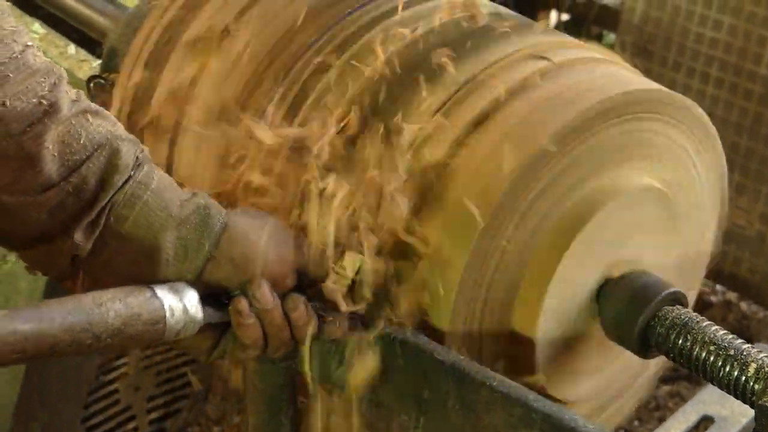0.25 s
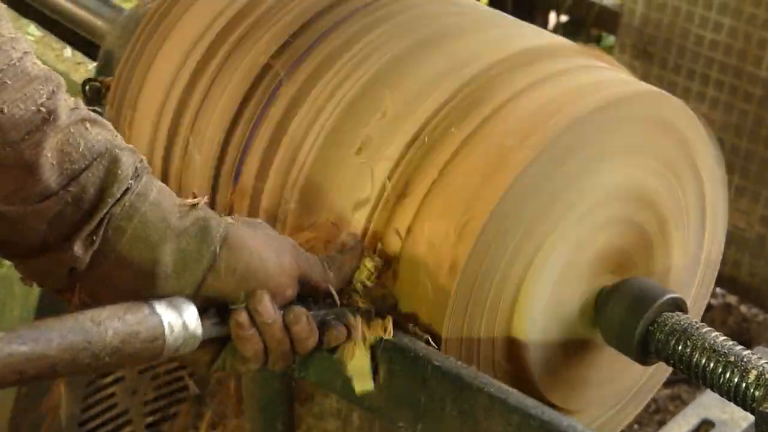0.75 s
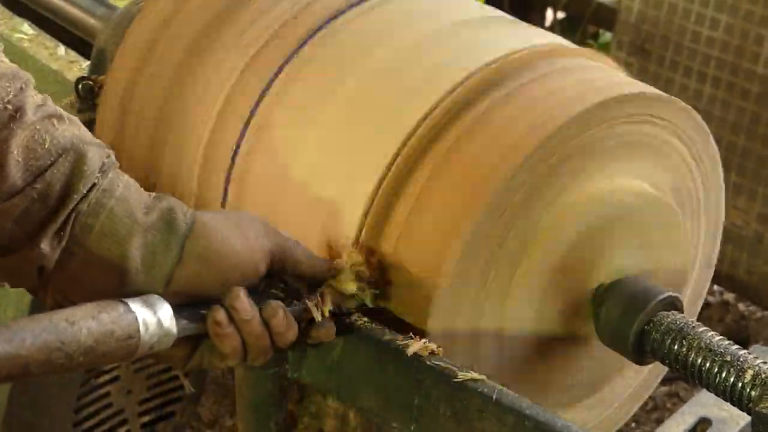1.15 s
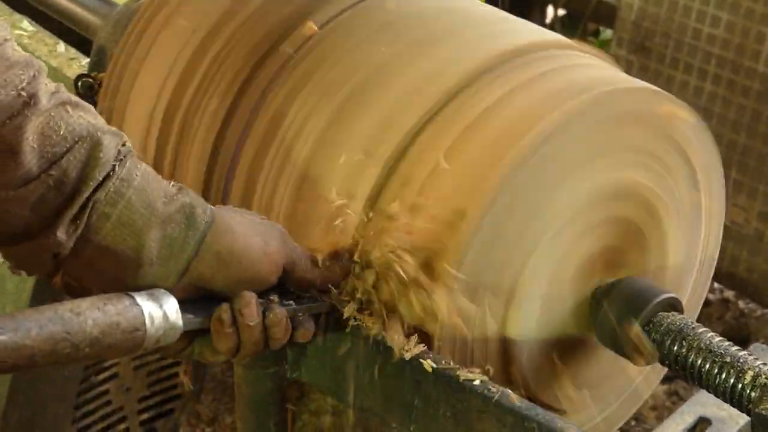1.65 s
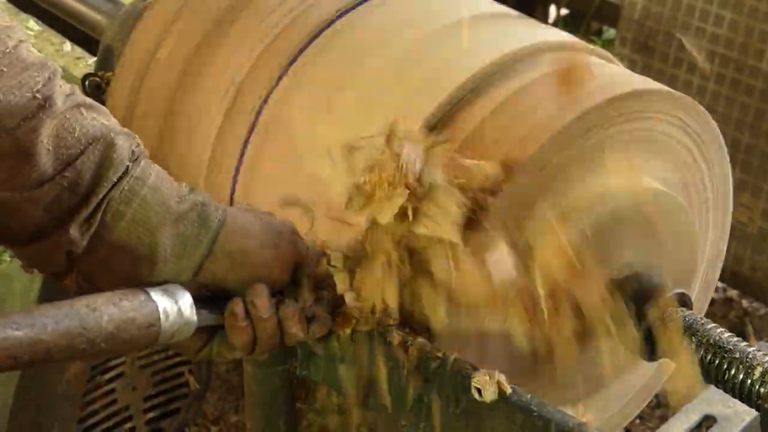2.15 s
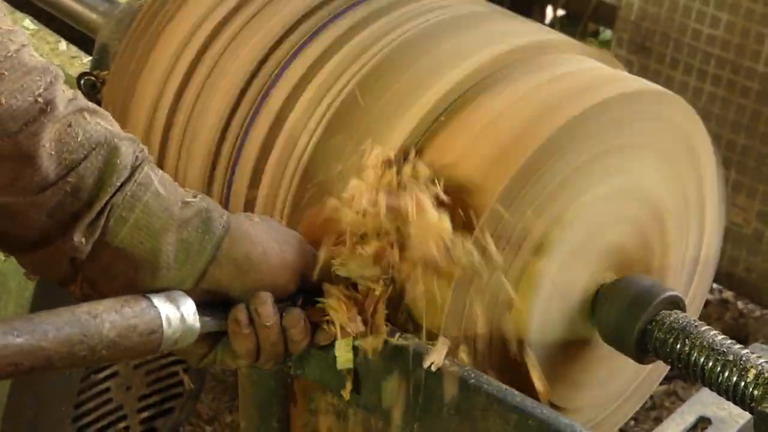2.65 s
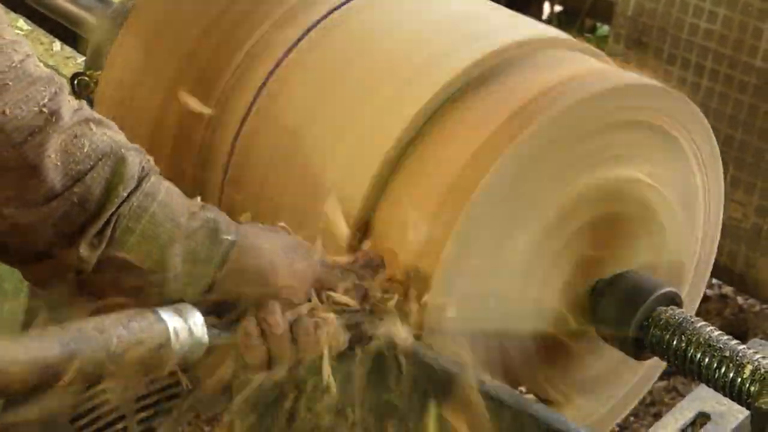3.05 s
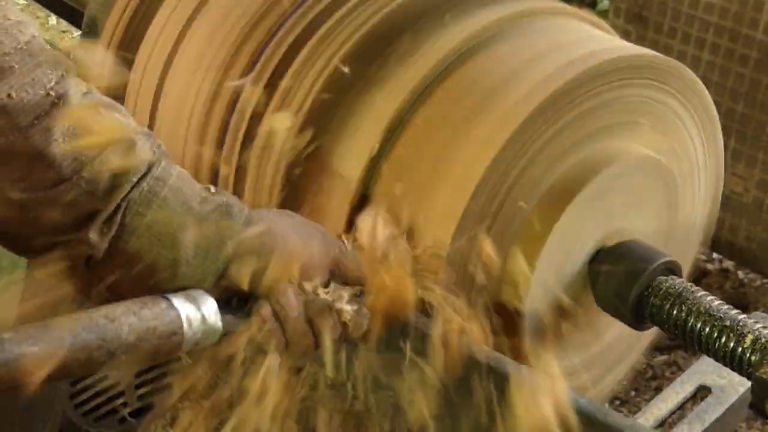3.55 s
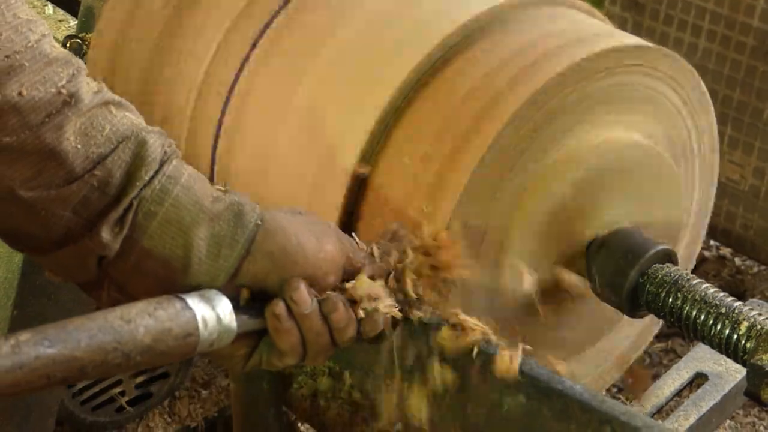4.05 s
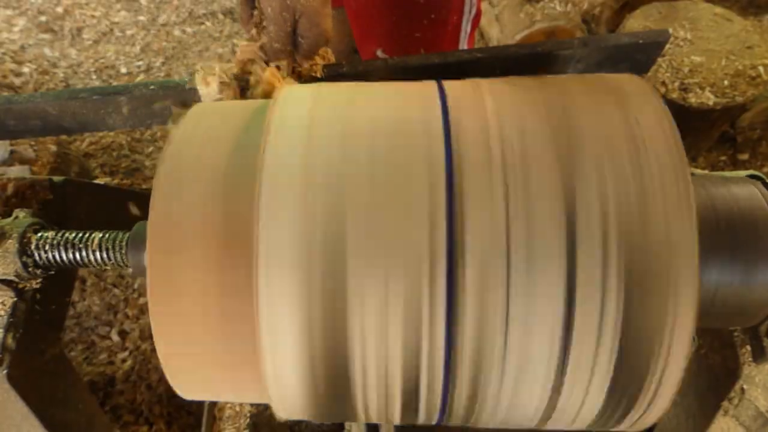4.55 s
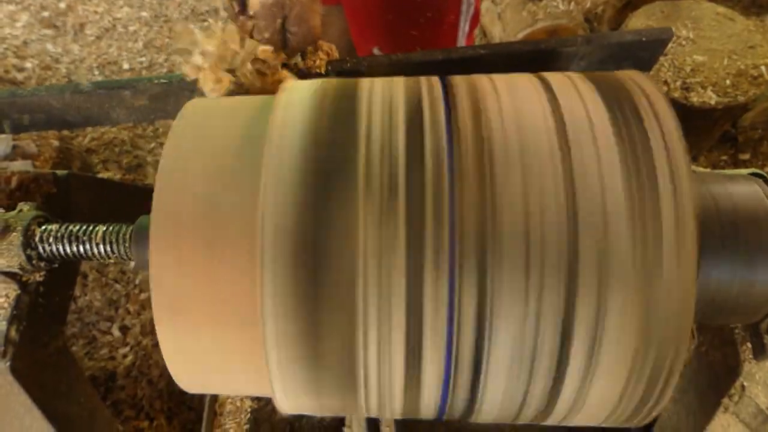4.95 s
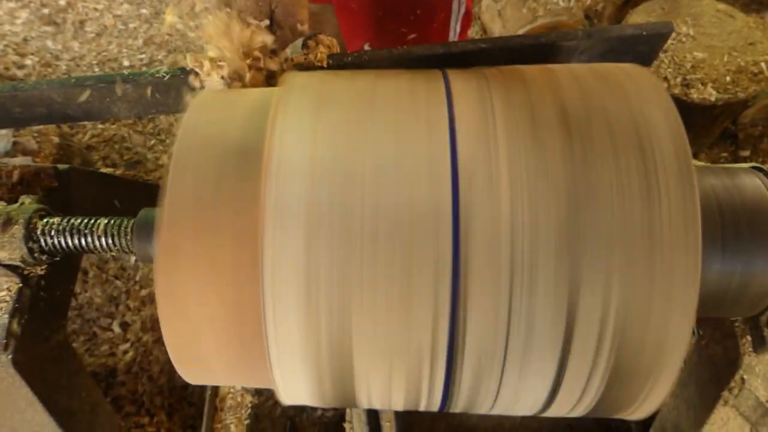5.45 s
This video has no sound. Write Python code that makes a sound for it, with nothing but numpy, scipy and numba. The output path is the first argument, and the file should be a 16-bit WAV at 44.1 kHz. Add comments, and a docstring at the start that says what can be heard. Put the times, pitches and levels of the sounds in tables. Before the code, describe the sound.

A gouge tears at a large spinning wooden blank, harsh pulsing hiss and metallic chatter over a low lathe rumble, with brief pauses and one silent gap.

```python
"""A gouge roughs a big wooden blank on a lathe, heard from two places with a silent gap between them.
Tearing fibres are a noise force, chopped by chatter and hollows, that excites the resonances of the steel.
Shavings are banded noise that outlasts the cut; the lathe is a coloured rumble with wavering hums;
the shed answers with a short decaying tail, and knocks are noise swells in the modes of the wood."""
import sys
import numpy as np
from scipy import signal
from scipy.fft import rfft, irfft
from scipy.io import wavfile
from scipy.ndimage import uniform_filter1d
from numba import njit

SR = 44100
rng = np.random.default_rng(int(sys.argv[2]) if len(sys.argv) > 2 else 0)


def persist_wave(psi):
    """Save psi, clipped to +-1, as 16-bit WAV."""
    counts = np.round(np.clip(psi, -1, 1) * 32767).astype(np.int16)
    wavfile.write(sys.argv[1], SR, np.atleast_2d(counts).T)


def field_ratio(decibels):
    """Amplitude ratio for a level in dB (20 dB per decade); scalars and array-likes work."""
    return 10 ** (np.asarray(decibels, dtype=float) / 20)


N = 251370
T = np.arange(N) / SR
STOP_S, RESTART_S = 4.432, 4.599  # the sound stops, then starts again from the second place
PLACE = (T > STOP_S).astype(int)  # 0 at the first place, 1 at the second


def unit(x):
    """Power normalization: scale to rms 1."""
    return x / np.sqrt(np.mean(x ** 2))


def curve(table):
    """Linear interpolation: columns of a (time [s], value, ..) table, one value a sample."""
    s, *columns = np.transpose(table)
    return [np.interp(T, s, column) for column in columns]


def colour(x, points):
    """Linear filtering: weight the spectrum by gains at points (frequency [Hz], gain [dB])."""
    hz, db = np.transpose(points)
    log_hz = np.log(np.fft.rfftfreq(N, 1 / SR) + 1)
    gain = field_ratio(np.interp(log_hz, np.log(hz), db))
    return irfft(rfft(x) * gain, N)


def walk(rate):
    """Slow random modulation: levels held 1 / rate s and smoothed, with rms 1."""
    hold = max(int(SR / rate), 1)
    steps = np.repeat(rng.standard_normal(N // hold + 1), hold)
    return unit(uniform_filter1d(steps, hold)[:N])


@njit
def ring(x, hz, width):
    """Resonance: a state-variable band-pass with moving centre and width [Hz], gain 1 at the centre."""
    y, band, low = np.empty(len(x)), 0., 0.
    for i in range(len(x)):
        g, damping = np.tan(np.pi * hz[i] / SR), width[i] / hz[i]
        v = (band + g * (x[i] - low)) / (1 + g * (g + damping))
        band, low, y[i] = 2 * v - band, low + 2 * g * v, damping * v
    return y


def steady_ring(x, hz, width):
    """Time-invariant resonance: its centre and width [Hz] stay in place."""
    return ring(x, np.full(N, 1. * hz), np.full(N, 1. * width))


def strikes(times, levels_db, rise_s, fall_s):
    """Impulse excitation: power swells with a Gaussian rise to each time and an exponential fall."""
    t = np.arange(-441, 2646) / SR
    shape = np.exp(np.where(t < 0, -(t / rise_s) ** 2, -t / fall_s))
    marks = np.zeros(N)
    marks[(np.asarray(times) * SR).astype(int)] = field_ratio(levels_db) ** 2
    return np.abs(signal.fftconvolve(marks, shape)[441:441 + N])


def linger(power, fall_s):
    """Exponential relaxation: power dies away with a time constant instead of stopping dead."""
    keep = np.exp(-1 / (fall_s * SR))
    return signal.lfilter([1 - keep], [1, -keep], power)


# spells of tool chatter: (nominal time of the first bounce [s], bounce rate [Hz])
CHATTER_SPELLS = [(0.0059, 76.2), (1.2919, 79.3), (1.5013, 74.1), (2.1006, 83.0), (2.5053, 76.3),
                  (3.2001, 78.75), (3.4035, 76.3), (4.6048, 76.6), (5.1006, 77.2)]
BOUNCE_LAND, BOUNCE_STAY, BOUNCE_LEAVE = 0.064, 0.26, 0.097  # shares of one bounce
BOUNCE_JITTER = 0.06  # share of one bounce
BOUNCE_SCATTER_DB = 1.5


def chatter(depth):
    """Intermittent contact: the edge lands, stays and leaves, each bounce with its own size and timing."""
    s, hz = np.transpose(CHATTER_SPELLS)
    spell = np.clip(np.searchsorted(s, T) - 1, 0, None)
    turns = (T - s[spell]) * hz[spell] + .5
    size, late = rng.standard_normal((2, len(s), 100))[:, spell, turns.astype(int) % 100]
    since = turns % 1 - .5 + BOUNCE_STAY / 2 - BOUNCE_JITTER * late
    landing = np.minimum(since, 0) / BOUNCE_LAND
    leaving = np.maximum(since - BOUNCE_STAY, 0) / BOUNCE_LEAVE
    contact = np.exp(landing - leaving)
    share = np.clip(depth, 0, .97)
    # mean power of the bounces is 1; the rest of the contact is steady
    return share * unit(field_ratio(BOUNCE_SCATTER_DB * size) * contact) ** 2 + 1 - share


# how hard the edge is fed into the wood; it is drawn back twice:
# (time [s], relative level [dB], chatter depth [0-1])
FEED_STRENGTH = [(0, -24.5, 0.66), (.35, -22, 0.64), (.7, -23, 0.73), (1.04, -25.5, 0.76),
                 (1.075, -43.5, .5), (1.16, -64, 0.2), (1.22, -50, 0.6), (1.283, -54, .3),
                 (1.289, -27.5, 0.7), (1.42, -23.5, .3), (1.65, -22.5, .15), (1.93, -18, 0.3),
                 (2.3, -21.5, .55), (2.355, -26, 1), (2.385, -40, .3), (2.445, -49, 0.5), (2.455, -29, 0.4),
                 (2.495, -39, .3), (2.508, -20.5, 0.5), (2.62, -23, 0.66), (3.1, -23, 0.68), (3.3, -23, .4),
                 (3.85, -23.5, 0.7), (4.15, -23.5, 0.44), (4.43, -23.5, 0.3), (4.6, -31.5, 0.56),
                 (4.7, -24, 0.86), (5.15, -22, 0.55), (5.7, -24, .6)]
# low spots of the blank, where the edge loses the wood and meets it again:
# (time of least contact [s], losing time [s], regaining time [s], depth [dB])
BLANK_HOLLOWS = [(0.133, 0.042, 0.044, 4), (0.291, 0.015, 0.004, 12), (0.309, 0.01, 0.0036, 8),
                 (0.393, 0.0088, 0.004, 6), (0.48, 0.022, 0.0034, 11), (0.578, 0.051, 0.004, 22),
                 (0.658, 0.041, 0.025, 13), (0.732, 0.012, 0.004, 5), (0.783, 0.0091, 0.004, 8),
                 (0.869, 0.047, 0.022, 14.5), (0.946, 0.013, 0.004, 8), (1.314, 0.0088, 0.0047, 12),
                 (1.462, 0.0075, 0.0068, 12), (1.613, 0.014, 0.005, 7), (1.688, 0.016, 0.005, 6.5),
                 (1.764, 0.016, 0.005, 7), (1.835, 0.016, 0.005, 4), (1.912, 0.012, 0.005, 7),
                 (1.992, 0.014, 0.004, 8), (2.075, 0.012, 0.0087, 9), (2.153, 0.01, 0.0037, 12),
                 (2.236, 0.013, 0.005, 6.0), (2.323, 0.013, 0.019, 6), (2.589, 0.021, 0.0036, 15),
                 (2.646, 0.022, 0.004, 5.5), (2.739, 0.018, 0.004, 5), (2.827, 0.033, 0.012, 11),
                 (2.919, 0.016, 0.0075, 10.0), (2.998, 0.013, 0.004, 11), (3.101, 0.034, 0.0035, 14),
                 (3.201, 0.059, 0.0074, 26), (3.291, 0.046, 0.0046, 6.5), (3.455, 0.013, 0.005, 10),
                 (3.531, 0.028, 0.008, 10), (3.621, 0.021, 0.017, 11), (3.717, 0.03, 0.025, 14.5),
                 (3.802, 0.015, 0.033, 12.5), (3.881, 0.013, 0.034, 9.5), (3.959, 0.015, 0.0059, 18.5),
                 (4.05, 0.025, 0.025, 16), (4.163, 0.057, 0.003, 27), (4.25, 0.048, 0.016, 23.0),
                 (4.33, 0.044, 0.022, 23), (4.379, 0.01, 0.0082, 16), (4.847, 0.026, 0.0076, 13),
                 (4.925, 0.027, 0.013, 19), (5.015, 0.014, 0.004, 12), (5.131, 0.073, 0.0036, 5.5),
                 (5.209, 0.025, 0.0055, 9.5), (5.289, 0.02, 0.005, 5), (5.393, 0.0074, 0.004, 16),
                 (5.587, 0.015, 0.005, 6.0)]
# the hardest bites of the edge: (time [s], relative level [dB])
EDGE_BITES = [(0.032, -15.5), (0.0673, -12.5), (0.0945, -14), (0.188, -9.5), (0.215, -12.5), (0.241, -12.5),
              (0.2964, -20), (0.322, -10.5), (0.3317, -14), (0.4333, -16), (0.501, -12), (0.5295, -13.5),
              (0.583, -13.5), (0.74, -15.5), (0.754, -17), (0.7672, -14), (0.803, -12.5), (0.873, -23),
              (0.9094, -15), (0.949, -15), (1.002, -14), (1.041, -17), (1.402, -12), (1.418, -13),
              (1.844, -12.5), (1.976, -17), (1.9966, -16), (2.0568, -18), (2.091, -16), (2.124, -13),
              (2.1376, -15.5), (2.2185, -11.5), (2.2573, -14.5), (2.302, -13.5), (2.3521, -15),
              (2.458, -25), (2.5164, -13), (2.6748, -13), (2.744, -13.5), (2.7918, -12), (2.87, -12),
              (2.9745, -12.5), (3.0527, -14.5), (3.107, -16.5), (3.1332, -10.5), (3.214, -13.5),
              (3.2472, -14.5), (3.389, -19.5), (3.585, -12.5), (3.675, -16), (3.7697, -18), (3.9387, -14),
              (4.007, -15), (4.086, -13), (4.176, -9), (4.2697, -23), (4.3612, -17), (4.698, -14.5),
              (4.774, -15.5), (4.7966, -18), (4.8633, -13.5), (4.891, -16.5), (4.9564, -15.5),
              (5.0623, -12.5), (5.1418, -15), (5.326, -14)]


def cutting_force():
    """Force modulation: feed power fades over hollows and is chopped by chatter, with bites on top."""
    level_db, depth = curve(FEED_STRENGTH)
    for s, losing, regaining, depth_db in BLANK_HOLLOWS:
        dip = np.interp(T, [s - losing, s, s + regaining], [0, 1, 0])
        level_db = level_db - depth_db * dip
    cut = field_ratio(level_db) ** 2 * chatter(depth)
    bites = strikes(*np.transpose(EDGE_BITES), rise_s=0.0012, fall_s=0.0022)
    return np.maximum(cut, bites)


# how the tool is held: (time [s], flute engagement [dB], tip ring frequency [Hz],
# tip engagement [dB], roll towards the high flute rings [dB/kHz])
TOOL_GRIP = [(0, 2.5, 9600, -2.5, 5.5), (.45, 2.5, 9800, -5, 4.5), (1.05, 1.5, 10300, -3.5, -3),
             (1.28, -3.5, 9100, 3, -2), (1.75, -6.5, 9600, 3.5, 11.5), (1.95, 0.5, 10400, -5.5, -12),
             (2.35, -0.5, 10200, -8.5, -11), (2.6, -1.5, 10080, -1, -3), (3.5, 1.5, 10200, -0.5, 0.5),
             (4.1, 3.5, 9850, 1, 1.5), (4.43, 2.5, 9300, 1.5, 2), (4.6, -2, 9770, -1, 0),
             (5.7, 0.5, 9800, -3.5, 2)]
# steel rings, a list for the first place and one for the second:
# (nominal frequency [Hz], width [Hz], relative level [dB])
MAIN_RINGS = [
    [(4434, 362, -2), (4584, 214, -3), (4970, 200, -5.5)],
    [(4080, 320, -2), (3626, 170, -2.5), (5550, 370, -3)],
]
SHANK_RINGS = [
    [(2955, 827, -4.5), (2160, 900, -22), (1860, 390, -33)],
    [(2750, 204, 1), (1780, 290, -27), (1390, 72, -19)],
]
FLUTE_RINGS = [
    [(6700, 475, 0.15), (7136, 340, -0.6), (7664, 344, -2.6)],
    [(6290, 490, 2.5), (7340, 650, -19.5), (7730, 590, -5)],
]
TIP_WIDTH_HZ, TIP_DB = 1370, -5
MAIN_PER_FLUTE, SHANK_PER_FLUTE = -0.51, -0.16  # dB per dB of flute engagement
SHANK_DB = (-7.5, -2.5)  # from the first place, from the second
GRAIN_DB, GRAIN_DB_PER_CHATTER = 1.0, 2.2  # unevenness: smooth in a steady cut, coarse in chatter


def gouge(power, flute_db, tip_hz, tip_db, roll_db):
    """Forced modal vibration: fibres snapping in uneven grains drive the rings of the steel."""
    depth = curve(FEED_STRENGTH)[1]
    grain_db = (GRAIN_DB + GRAIN_DB_PER_CHATTER * depth) * walk(600) + 0.42 * walk(60)
    tear = np.sqrt(power) * unit(field_ratio(grain_db) * rng.standard_normal(N))
    tip_width = np.full(N, 1. * TIP_WIDTH_HZ)
    out = field_ratio(tip_db + TIP_DB) * ring(ring(tear, tip_hz, 2 * tip_width), tip_hz, tip_width)
    main_db = 0.94 + MAIN_PER_FLUTE * flute_db
    shank_db = np.take(SHANK_DB, PLACE) + SHANK_PER_FLUTE * flute_db
    for modes, grip_db in ((MAIN_RINGS, main_db), (SHANK_RINGS, shank_db), (FLUTE_RINGS, flute_db)):
        for pair in np.transpose(modes, (1, 2, 0)):
            hz, width, db = pair[:, PLACE]
            if modes is FLUTE_RINGS:
                db = db + roll_db * (hz - 7000) / 1000
            # each ring wanders a little at random in pitch and level
            hz = hz * (1 + 0.0097 * walk(15))
            level = field_ratio(grip_db + db + 1.74 * walk(22.03))
            out += level * ring(ring(tear, hz, 4 * width), hz, 1. * width)
    return field_ratio(9) * out


# tone of tearing fibres and flying shavings: (frequency [Hz], filter gain [dB])
SHAVINGS_TONE = [(100, -32), (300, -34.5), (1000, -30), (2500, -20), (5500, -12), (8500, -15.5),
                 (11200, -14.5), (12500, -16), (14000, -11), (15800, -6)]
SHAVINGS_DB = (-0.7, 4.5)  # from the first place, from the second
SHAVINGS_PER_TIP = 0.53  # dB per dB of tip engagement


def shavings(power, level_db):
    """Band-filtered noise: the spray of chips outlasts the cut, flickers in patches and spreads wide."""
    spray = np.sqrt(0.6 * power + 0.55 * linger(power, fall_s=0.01)) * field_ratio(2.26 * walk(250))
    out = 0
    for hz in 400 * 2 ** np.arange(0, 5.6, .5):  # half-octave bands
        mid, side = (steady_ring(spray * rng.standard_normal(N), hz, hz / 3) for _ in range(2))
        out = out + field_ratio(0.89 * walk(25)) * (mid + 0.38 * side * np.array([[1], [-1]]))
    return field_ratio(level_db + 6.5) * colour(out, SHAVINGS_TONE)


# the lathe running: (time [s], relative level [dB])
LATHE_LEVEL = [(0, -44), (.65, -49.5), (1.05, -47.5), (1.16, -54), (1.35, -47), (2.4, -49), (3.03, -46),
               (3.34, -50), (3.95, -49), (4.43, -50), (4.6, -46), (4.8, -43), (5.3, -39.5), (5.7, -38.5)]
# spectrum of its rumble: (frequency [Hz], relative level per Hz [dB])
RUMBLE_TONE = [(30, -29), (60, -13), (110, -8.5), (240, -4.5), (400, -2.5), (700, 1), (1300, 1), (2200, -3),
               (3500, -11.5), (8000, -15), (16000, -15.5)]
# its hums: (frequency [Hz], width [Hz], mean level relative to the rumble [dB])
LATHE_HUMS = [(149, 12, -22), (232, 20, -16), (527.7, 11, -19.5), (696, 15, -15.5)]
SHAKE_DB, SHAKE_HZ = 7.5, 300  # bass swing from no chatter to full chatter, below this pitch


def rumble():
    """Broadband and narrow-band noise: a flickering rumble and wavering hums; chatter shakes the bed."""
    out = unit(colour(field_ratio(1.5 * walk(10)) * rng.standard_normal(N), RUMBLE_TONE))
    for hz, width, db in LATHE_HUMS:
        hum = unit(steady_ring(rng.standard_normal(N), hz, width))
        out += field_ratio(db + 3.1 * walk(5.4)) * hum
    bass = colour(out, [(SHAKE_HZ, 0), (2 * SHAKE_HZ, -40)])
    depth = curve(FEED_STRENGTH)[1]
    return out + (field_ratio(SHAKE_DB * (depth - .5)) - 1) * bass


def lathe():
    """Partial coherence: motor, belt and bearings sound mostly alike left and right."""
    mid = rumble()
    side = colour(rumble(), [(60, -8.5), (130, -5), (300, -6), (900, 0.5)])
    return field_ratio(curve(LATHE_LEVEL)[0]) * (mid + 0.4 * side * np.array([[1], [-1]]))


SHED_T60_S, SHED_DB = 0.058, -9.5


def shed(x):
    """Diffuse reverberation: dense, exponentially decaying reflections, different at each ear."""
    t = T[:SR // 2]
    decay = np.exp(-np.log(1000) * t / SHED_T60_S)
    tail = rng.standard_normal((2, len(t))) * decay * (t > .002)
    tail /= np.sqrt(np.sum(tail ** 2, axis=1, keepdims=True))
    return field_ratio(SHED_DB) * signal.fftconvolve(x[None], tail, axes=1)[:, :N]


# dull knocks in the wood, each peaking 5.4 ms after its time:
# (time [s], relative level [dB], hardness [dB/octave])
WOOD_KNOCKS = [(0.083, -41.5, 9.5), (0.528, -33, 3), (0.687, -37, -1), (0.91, -44, 9), (2.365, -30.5, -1.5),
               (2.593, -42, -2), (2.845, -40, -3), (2.967, -39.5, -5), (3.038, -37, -1), (3.12, -34, 2),
               (3.66, -40.5, -3.5), (4.654, -31.5, 4.5), (4.766, -28, 5), (4.944, -36, -4),
               (5.067, -30.5, 3), (5.141, -28.5, 6.5), (5.218, -27, 3.5), (5.289, -26, 1),
               (5.363, -27, 3.5), (5.594, -35.5, -6.5)]
# modes of the hollow wood: (frequency [Hz], width [Hz], relative level [dB])
WOOD_MODES = [(246, 100, -8.5), (525, 35, -0.5), (714, 97, -4.5), (1092, 86, -4.5), (1430, 92, -6),
              (1790, 100, -6.5)]


def knocks():
    """Modal excitation: short soft blows ring the wood; a harder contact favours the upper modes."""
    s, db, tilt_db = np.transpose(WOOD_KNOCKS)
    out = np.zeros(N)
    for hz, width, mode_db in WOOD_MODES:
        blow_db = db + tilt_db * np.log2(hz / 900)
        power = strikes(s + 0.0054, blow_db, rise_s=0.006, fall_s=0.0056)
        blows = np.sqrt(power) * rng.standard_normal(N)
        out += field_ratio(mode_db + 13) * steady_ring(blows, hz, width)
    return out


LEFT_DB = 1  # level difference: the tool sits slightly left


def scene():
    """Superposition: the work near the microphone, its room and the machine add up."""
    flute_db, tip_hz, tip_db, roll_db = curve(TOOL_GRIP)
    power = cutting_force()
    near = gouge(power, flute_db, tip_hz, tip_db, roll_db) + knocks()
    spray = shavings(power, np.take(SHAVINGS_DB, PLACE) + SHAVINGS_PER_TIP * tip_db)
    panned = near * field_ratio(np.array([[LEFT_DB], [-LEFT_DB]]) / 2)
    return panned + shed(near) + spray + lathe()


def top_cut(x):
    """Nothing passes above the cut-off."""
    return signal.sosfilt(signal.butter(12, 16830, fs=SR, output="sos"), x)


TOP_HZ = 15720


def record(dry):
    """Low-pass filtering and gating: the top is cut; sound fades fast at the gap and returns in 2 ms."""
    fade = np.exp(-np.clip(T - STOP_S, 0, None) / 0.00057)
    back = np.clip((T - RESTART_S) / .002, 0, 1)
    gate = np.where(T < RESTART_S, fade, back)
    low_pass = signal.ellip(10, .2, 60, TOP_HZ, fs=SR, output="sos")
    mix = signal.sosfilt(low_pass, dry) * gate
    return top_cut(mix)


dry = scene()
out = record(dry)
persist_wave(out)
```